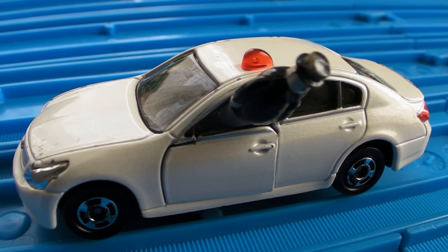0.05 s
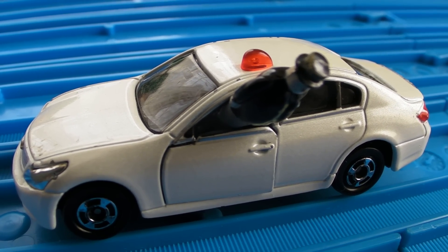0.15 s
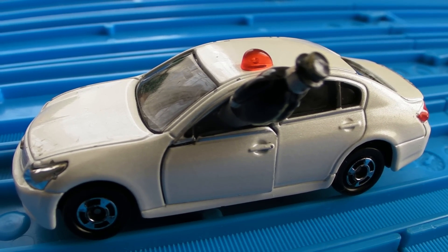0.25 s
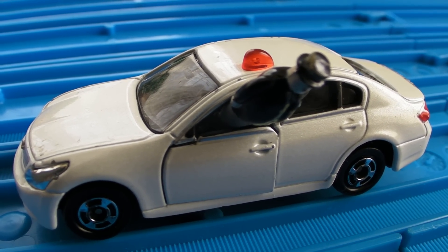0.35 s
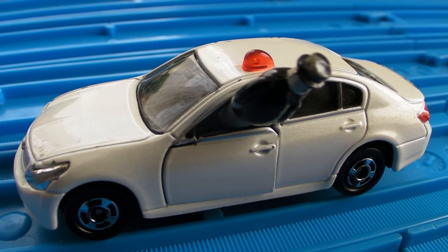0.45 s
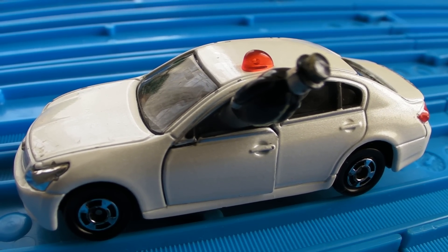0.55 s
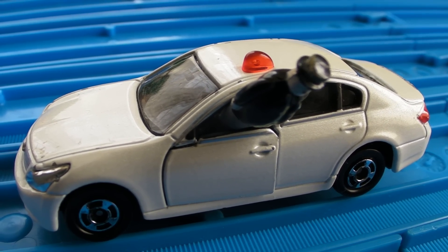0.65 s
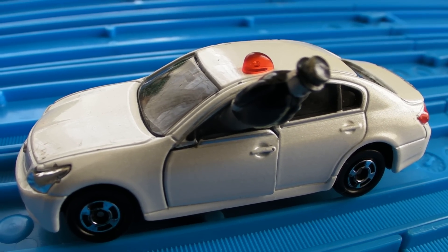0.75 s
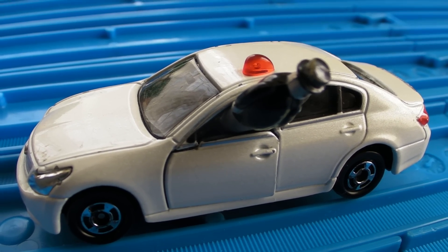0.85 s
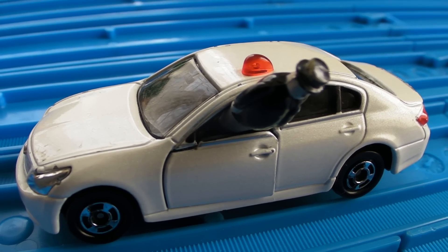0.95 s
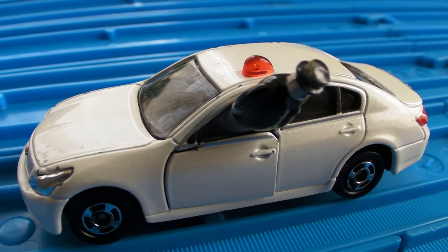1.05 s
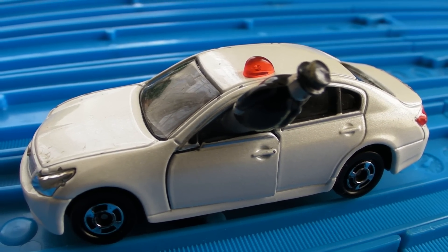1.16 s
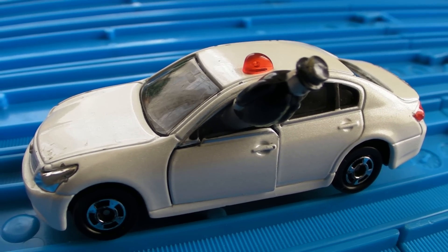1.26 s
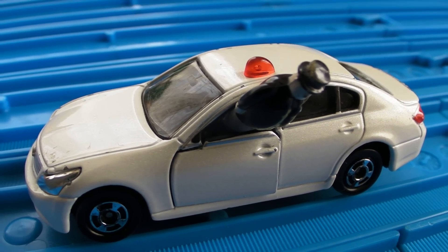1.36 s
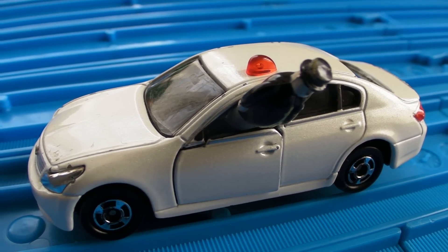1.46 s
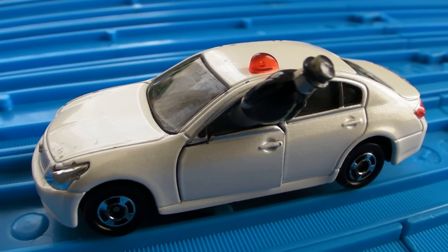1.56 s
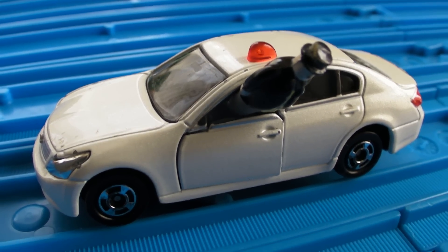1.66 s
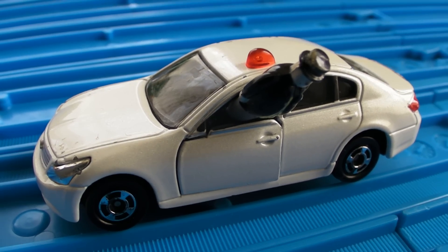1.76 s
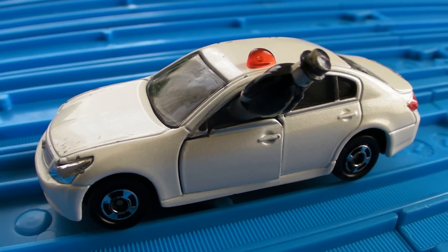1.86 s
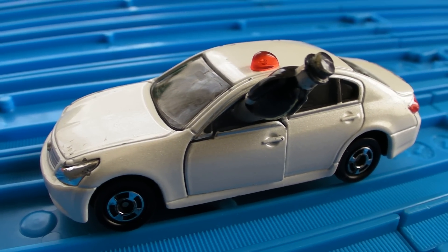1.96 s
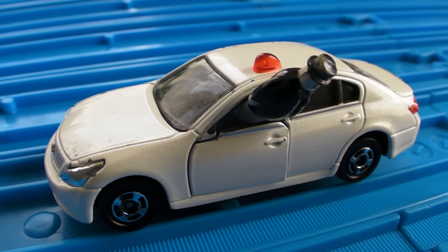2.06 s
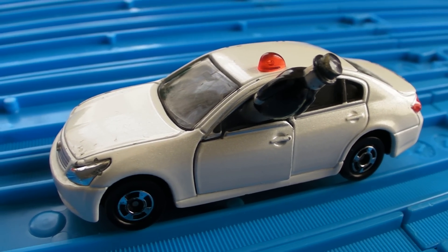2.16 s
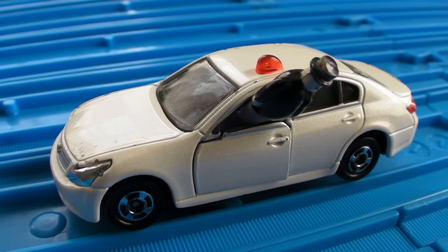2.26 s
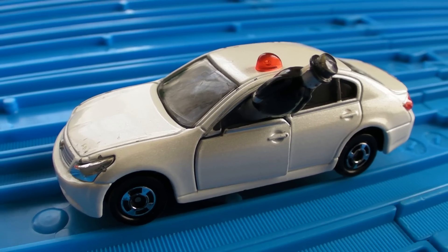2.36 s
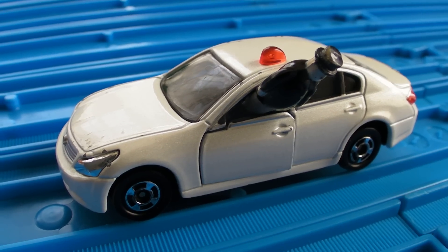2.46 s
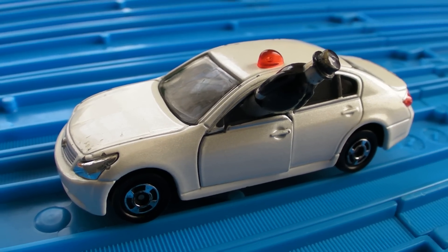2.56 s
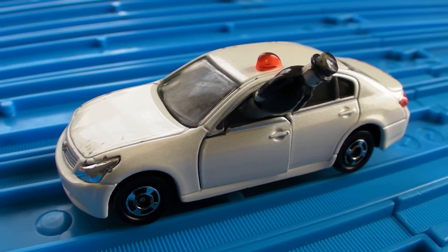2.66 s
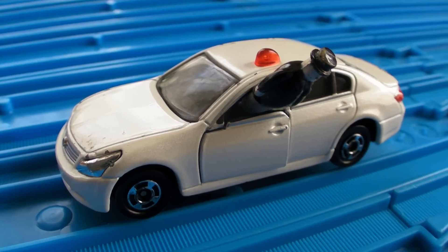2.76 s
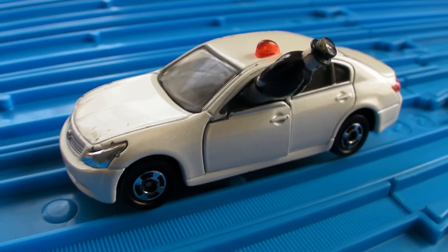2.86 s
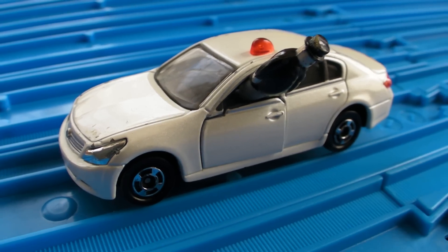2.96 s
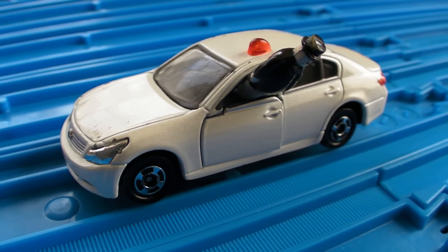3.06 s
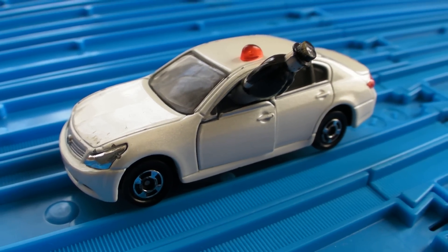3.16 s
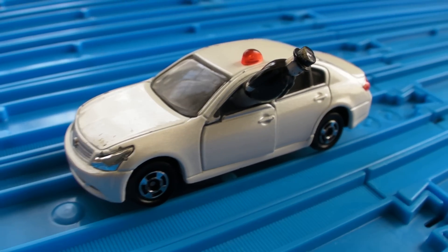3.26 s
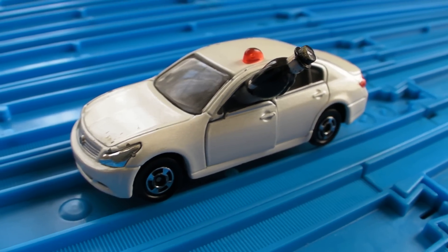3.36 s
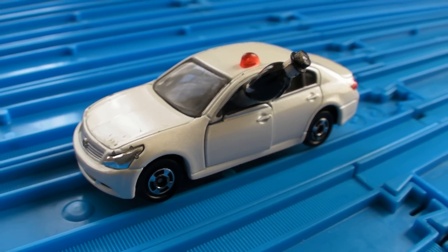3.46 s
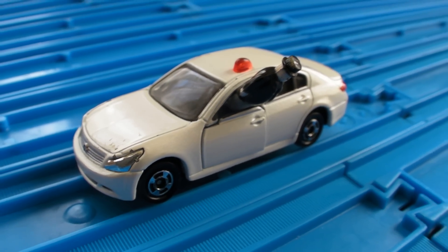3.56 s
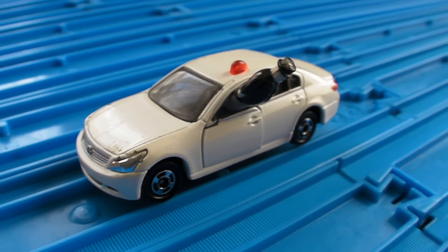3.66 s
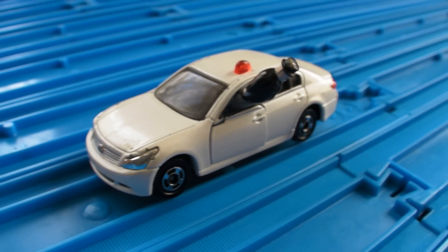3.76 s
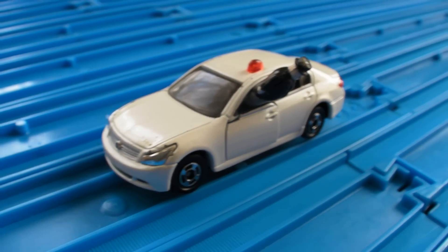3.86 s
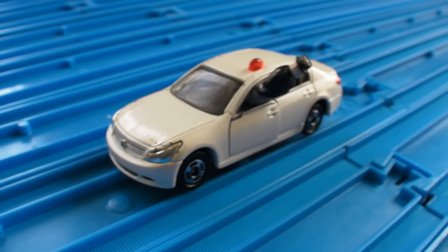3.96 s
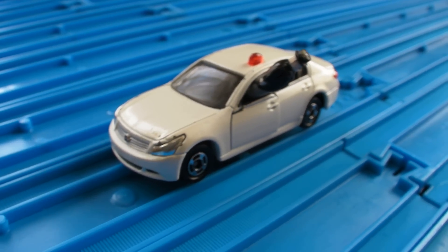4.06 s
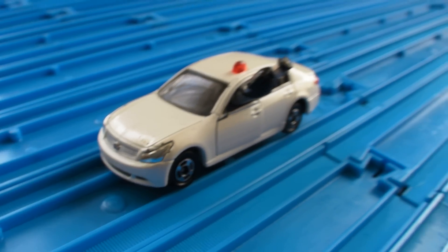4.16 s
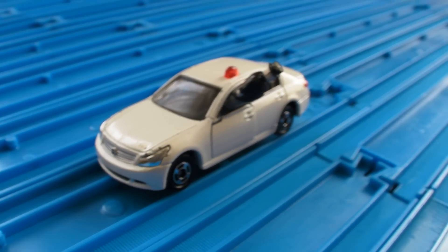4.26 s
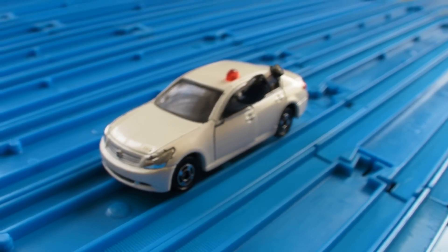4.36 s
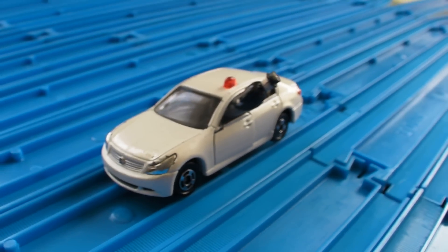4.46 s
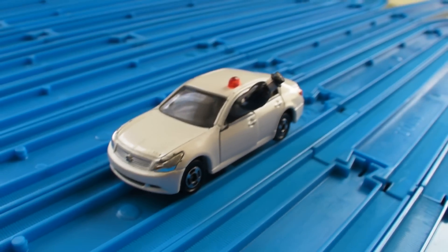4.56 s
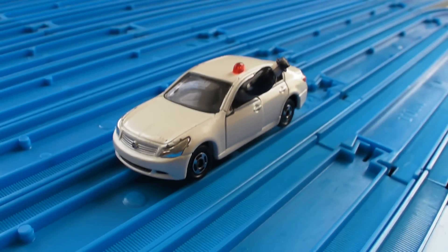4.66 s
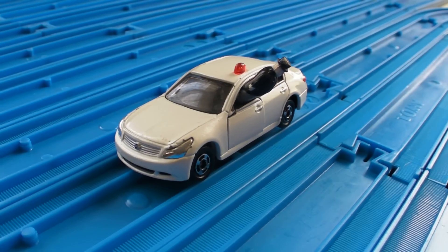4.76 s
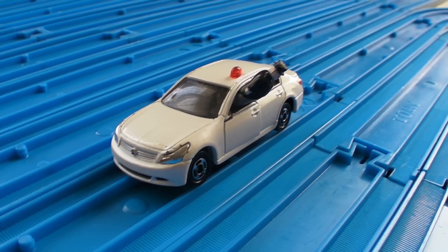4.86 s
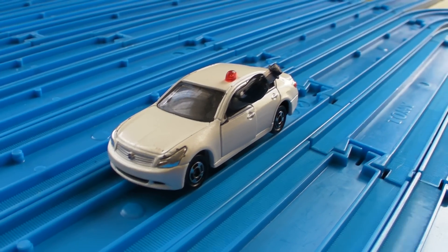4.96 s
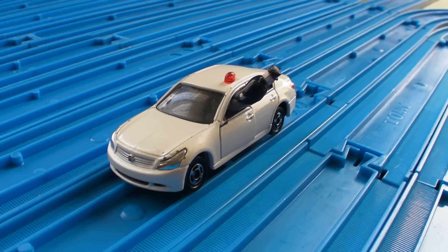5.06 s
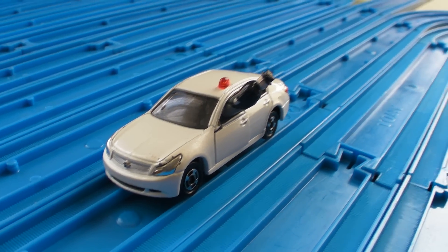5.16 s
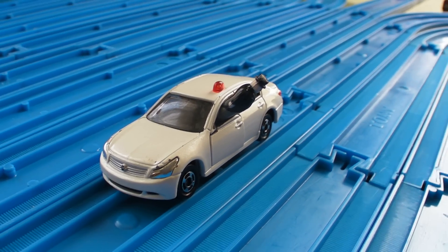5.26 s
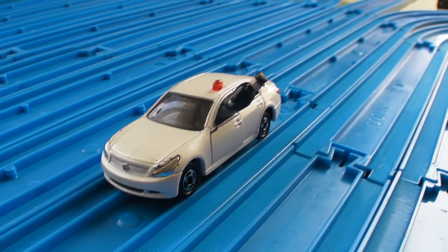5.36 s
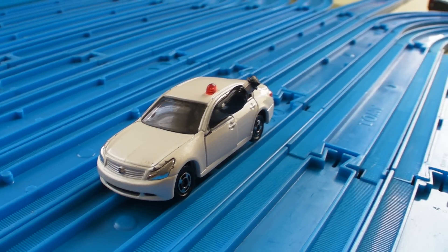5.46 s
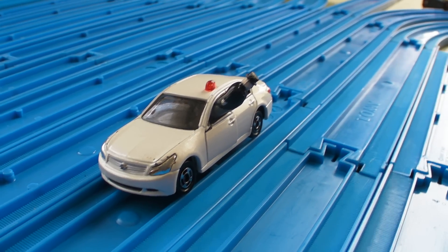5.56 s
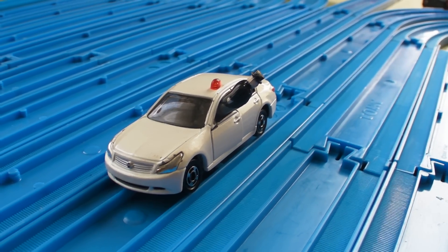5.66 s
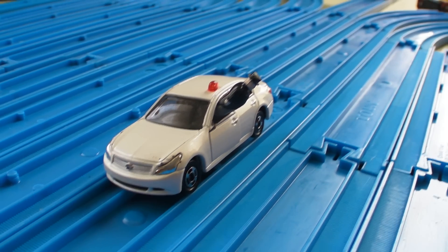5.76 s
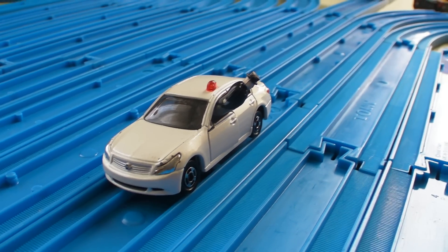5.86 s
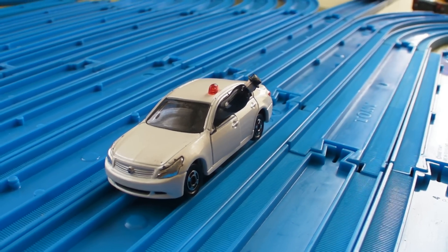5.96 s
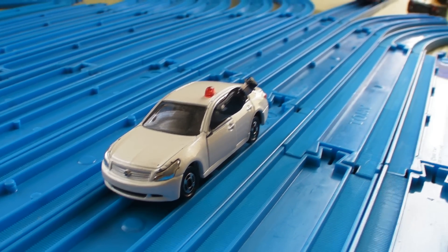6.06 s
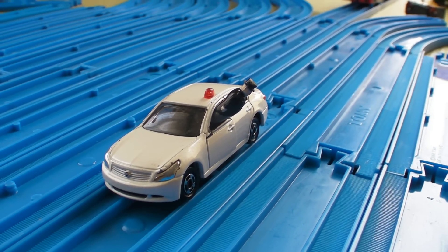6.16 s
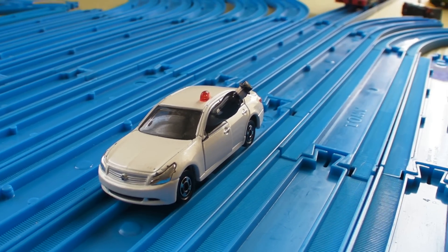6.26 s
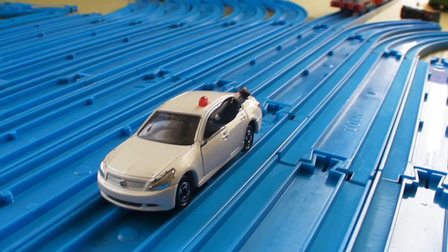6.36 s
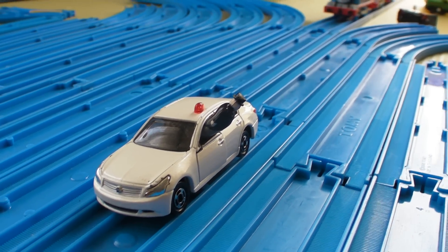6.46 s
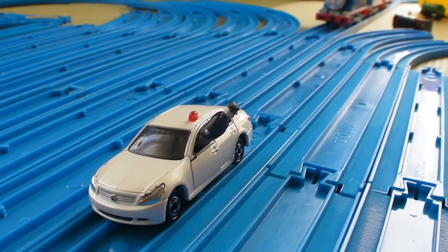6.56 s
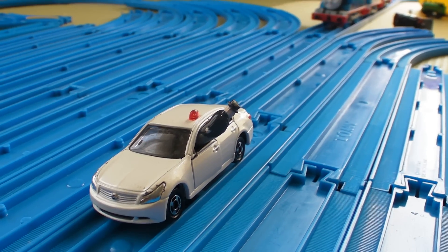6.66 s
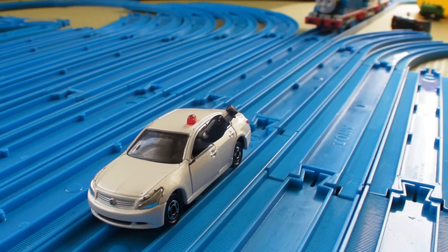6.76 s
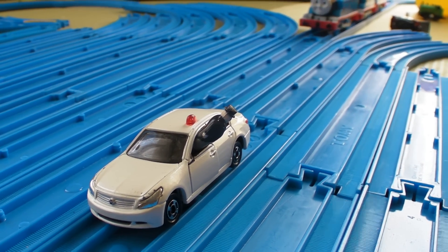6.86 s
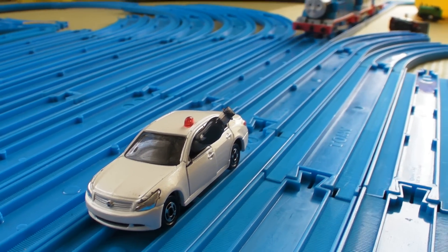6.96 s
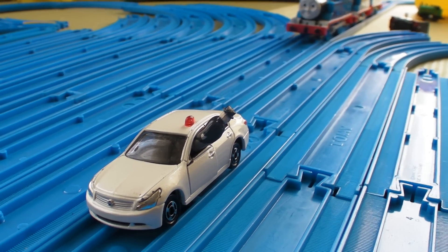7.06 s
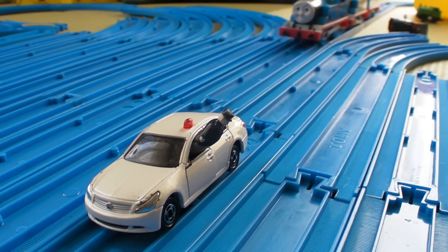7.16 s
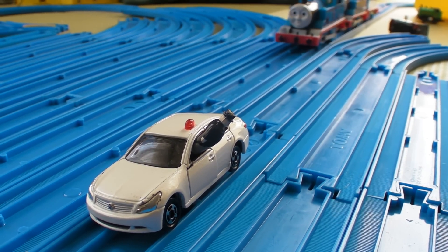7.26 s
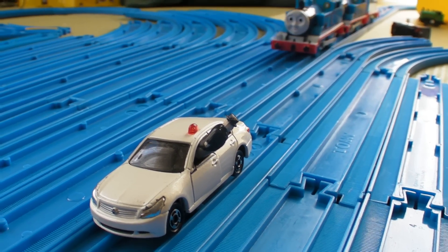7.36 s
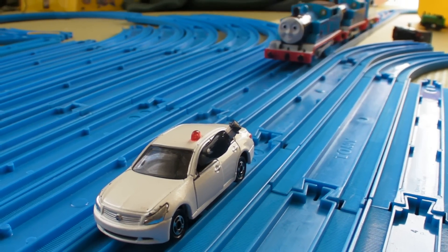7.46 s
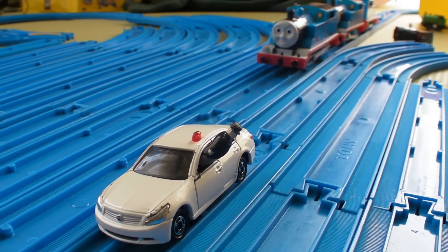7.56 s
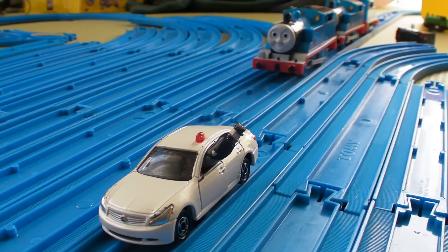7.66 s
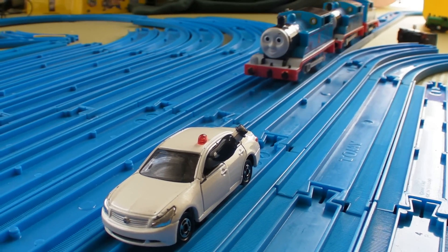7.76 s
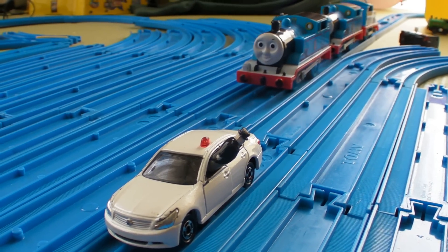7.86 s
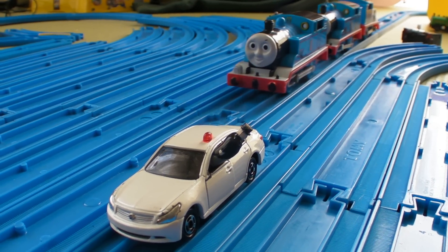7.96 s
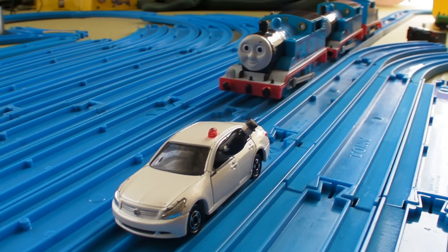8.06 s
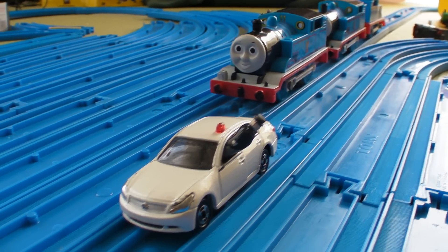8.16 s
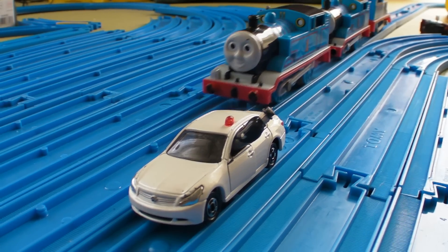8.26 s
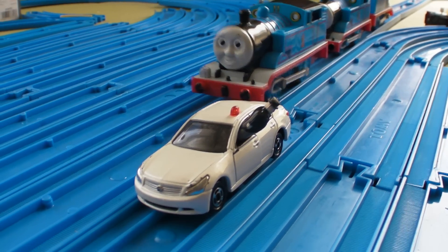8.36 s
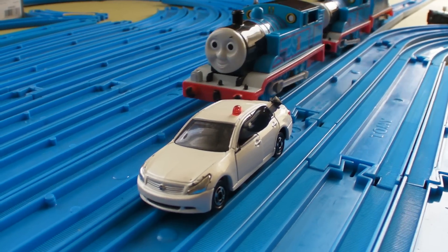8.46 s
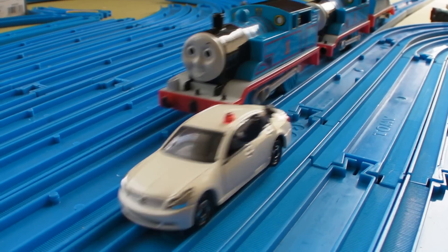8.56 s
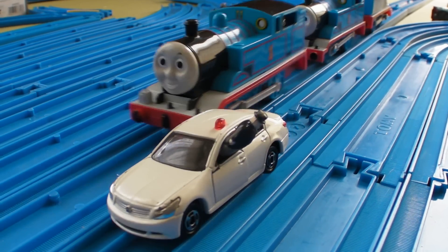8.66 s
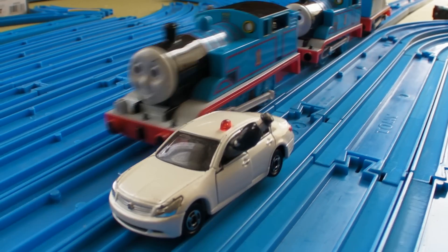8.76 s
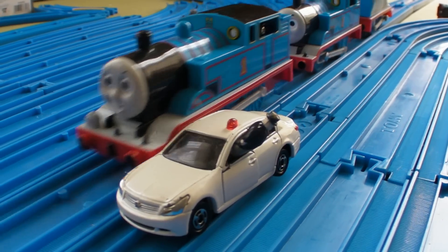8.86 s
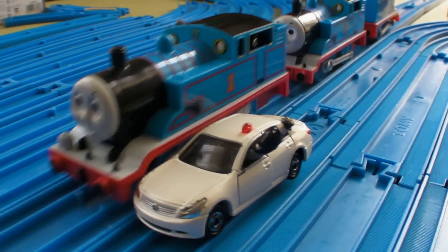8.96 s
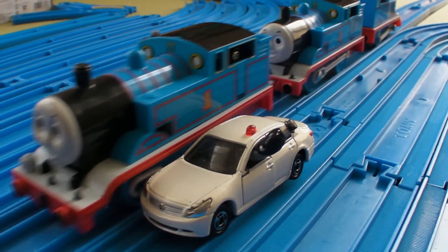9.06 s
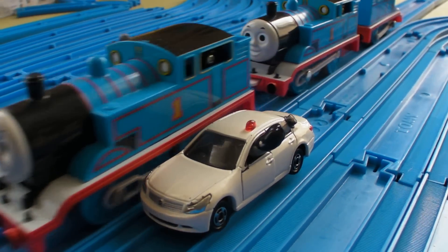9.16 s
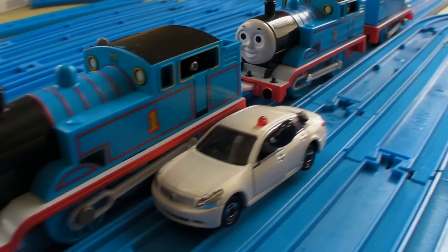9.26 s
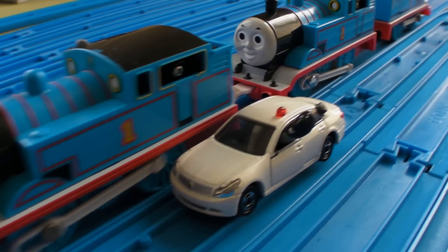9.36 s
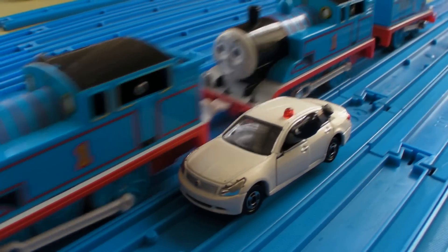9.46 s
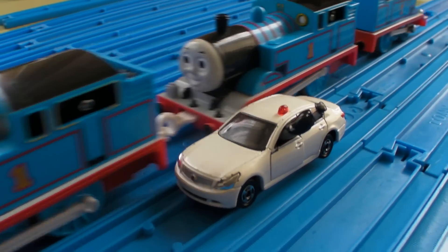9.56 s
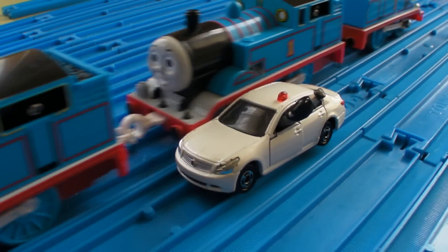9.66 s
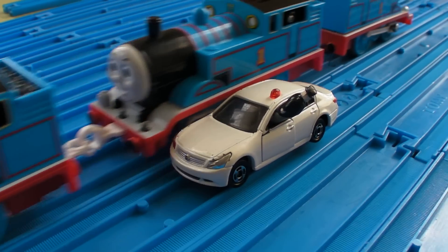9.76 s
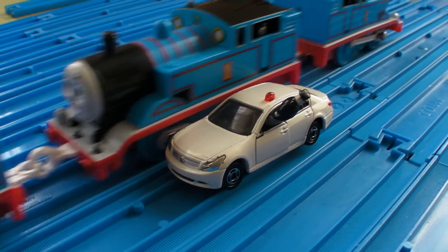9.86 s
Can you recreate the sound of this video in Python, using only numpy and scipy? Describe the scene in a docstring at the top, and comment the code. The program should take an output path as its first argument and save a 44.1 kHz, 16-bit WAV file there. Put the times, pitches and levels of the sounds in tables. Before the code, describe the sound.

In a small, dry room a battery-powered toy train runs on plastic track. Its gear whine continually sags and recovers over a thin rasp, faint at first. A sharp click comes early, a muffled bump at about four seconds, then small knocks. The train gradually nears the microphone, whining and rattling loudest near nine seconds, with another sharp click just before, and is still buzzing at the end.

```python
"""In a small room a battery toy train runs round a plastic track and comes up close to the microphone. Its
plastic gears whine as mesh tones, the pitch sagging and recovering with the load; the rasp of chattering teeth
is noise coloured by the plastic shell. Wheel roll is coloured noise; plastic knocks, two sharp clicks and a few
soft bumps are noise bursts in resonators, above a low rumble."""
import sys
import numpy as np
from scipy import signal
from scipy.fft import rfft, irfft, next_fast_len
from scipy.io import wavfile
from scipy.ndimage import map_coordinates

SR = 44100
rng = np.random.default_rng(int(sys.argv[2]) if len(sys.argv) > 2 else 0)


def unload_audio(sound):
    """Save the sound as a 16-bit wav file, at the path given as the first command line argument."""
    columns = np.transpose(np.atleast_2d(sound))
    # keep every value between -1 and 1, then stretch to whole-number steps
    steps = np.round(np.clip(columns, -1, 1) * 32767)
    wavfile.write(sys.argv[1], SR, steps.astype(np.int16))


N = 437031
TIME = np.arange(N) / SR


def from_db(db):
    """Amplitude factor of a level in dB."""
    return 10 ** (np.asarray(db) / 20)


def rms_one(x):
    """Scale to rms 1."""
    return x / np.sqrt(np.mean(x ** 2) + 1e-20)


def in_time(rows):
    """Each column of a curve at every sample."""
    s, *columns = np.transpose(rows)
    return [np.interp(TIME, s, column) for column in columns]


def swell(s, half_s, steepness=2, skew=1):
    """Smooth hump of height 1 at s, half at half_s on either side; skew steepens the rise, draws out the fall."""
    side_s = np.where(TIME < s, half_s / skew, half_s * skew)
    distance = np.minimum(np.abs(TIME - s) / side_s, 4)
    return .5 ** distance ** steepness


def lowpass(x, hz):
    """Second-order low-pass."""
    return signal.sosfilt(signal.butter(2, min(hz, SR / 2 - 1), fs=SR, output="sos"), x)


def drift(hz):
    """Chance fluctuation slower than hz, with spread 1."""
    settled = lowpass(rng.standard_normal(N + SR), hz)[SR:]
    return rms_one(settled)


def colour(x, spectrum):
    """Smooth response of a body, falling 12 dB per octave outside its table; rms 1."""
    size = next_fast_len(N)
    hz, db = np.transpose(spectrum)
    bins_hz = np.maximum(np.fft.rfftfreq(size, 1 / SR), 1)
    outside = np.maximum(np.maximum(hz[0] / bins_hz, bins_hz / hz[-1]), 1)
    gain = from_db(np.interp(np.log(bins_hz), np.log(hz), db)) / outside ** 2
    return rms_one(irfft(rfft(x, size) * gain, size)[..., :N])


def resonate(x, hz, width_hz):
    """One resonance, gain 1 on top."""
    r = np.exp(-np.pi * width_hz / SR)
    zeros = np.array([1, 0, -1]) * (1 - r * r) / 2
    poles = [1, -2 * r * np.cos(2 * np.pi * hz / SR), r * r]
    return signal.lfilter(zeros, poles, x + 1e-18)


def burst(s, rise_s, decay_s):
    """Half a second of contact noise that swells and dies, and its place in time."""
    start = int(s * SR)
    span = slice(start, min(start + SR // 2, N))
    age_s = TIME[span] - TIME[span][0]
    envelope = (1 - np.exp(-(age_s / rise_s) ** 2)) * np.exp(-age_s / decay_s)
    return span, rng.standard_normal(len(age_s)) * envelope


def widen(mid, side, likeness):
    """Left and right from a shared and an opposed part."""
    c = np.clip(likeness, 0, 1)
    opposed = side * np.array([[1], [-1]])
    return np.sqrt((1 + c) / 2) * mid + np.sqrt((1 - c) / 2) * opposed


# Load dragging the motor down. Each row: deepest point in seconds, length in seconds,
# sag of the mesh rate in Hz, whine gain in dB.
LOAD_SAGS = [(0.051, 0.2, 165, 7.5), (0.378, 0.27, 254, 16), (0.589, 0.16, 105, 3.5),
             (.81, 0.38, 182, 10.5), (1.265, .35, 215, 16), (1.635, 0.27, 290, 14.5),
             (2.131, 0.19, 275, 16), (2.557, 0.29, 320, 24.5), (3.04, .26, 309, 16),
             (3.467, 0.14, 315, 14.5), (3.589, 0.12, 150, 6), (3.841, .27, 119, 4.5),
             (4.235, 0.2, 255, 8.5), (4.4, .12, 135, 2), (4.7, 0.28, 320, 16), (5.118, 0.28, 208, 5),
             (5.631, .26, 345, 12), (6.027, 0.11, 265, 15.5), (6.112, .04, 195.5, 15.5), (6.259, .2, 90, 2),
             (6.521, 0.31, 287, 19), (6.906, 0.34, 228, 17), (7.329, .38, 219, 14), (7.638, 0.091, 155, 11),
             (7.841, .24, 237, 8.5), (8.194, 0.12, 265, 6), (8.281, 0.067, 315, 12), (8.352, 0.059, 215, 8),
             (8.835, .14, 60, -2), (9.155, 0.25, 262, 4.5), (9.701, 0.5, 227, 3.5)]
# Drive falters, then catches with a spurt. Each row: time in seconds, dip in dB, spurt in dB,
# jump of the mesh rate in Hz.
DRIVE_FALTERS = [(0.636, 2.5, 0, 170.5), (1.89, 6, 3.5, 70), (3.911, 6.5, 3, 160), (4.666, 0.5, 1, 90),
                 (5.175, 0.5, -1, 80), (5.868, 4.5, 2.5, 21), (6.052, 3, 2, 80), (6.135, 3, 1.5, 39),
                 (6.7, 2, 0.5, 69.5), (7.654, 3, 2, 59.5), (8.218, 1, 0.5, 81), (8.3, 4, 3, 19),
                 (8.395, 4.5, 7, -0.5), (8.47, 7, 5, 70), (8.589, 2.5, 2.5, 20.5), (8.7, 9, 6, 159.5)]
# Gears as the train nears, before sags and falters. Each row: time in seconds, chatter in dB,
# whine relative to chatter in dB.
GEAR_CURVE = [(0, -31.5, -12), (2.8, -32, -16.5), (2.9, -30, -11.5), (3.35, -29.5, -10),
              (4.05, -29.5, -9.5), (4.24, -24.5, -7.5), (4.36, -27.5, -11), (5.45, -25, -7.5),
              (6.15, -24.5, -13.5), (7.6, -20.5, -9.5), (8.15, -19.5, -3.5), (8.55, -19, -2),
              (8.88, -18.5, -1.5), (9.05, -19.5, -2), (9.91, -22, -6)]


def drive(free_mesh_hz=1310, sag_steepness=2.7, pressure_lead_s=0.0088):
    """Mesh rate, whine and chatter levels: load slows the gears and presses the teeth into a louder tone."""
    falter_s, catch_after_s, spurt_s = 0.027, 0.04, 0.018
    slip_after_s, slip_skew = 0.031, 1.5  # the motor races at once and is pulled back more slowly
    chatter_db, whine_over_chatter_db = in_time(GEAR_CURVE)
    mesh_hz = np.full(N, float(free_mesh_hz))
    for s, length_s, sag_hz, gain_db in LOAD_SAGS:
        mesh_hz -= sag_hz * swell(s, length_s / 2, sag_steepness)
        # the teeth feel the load before the motor has slowed
        whine_over_chatter_db += gain_db * swell(s - pressure_lead_s, length_s / 2, sag_steepness)
    for s, dip_db, spurt_db, jump_hz in DRIVE_FALTERS:
        dip = swell(s, falter_s)
        spurt = swell(s + catch_after_s, spurt_s)
        mesh_hz += jump_hz * swell(s + slip_after_s, spurt_s, skew=slip_skew)
        chatter_db += spurt_db * spurt - dip_db * dip
        whine_over_chatter_db -= dip_db * dip  # the tone dips twice as far as the rasp
    return mesh_hz, chatter_db + whine_over_chatter_db, chatter_db


WHEEL_TEETH = 35


def whine(teeth, mesh_hz, whine_db, chatter_db):
    """Mesh tones: the main one at twice the mesh rate; an off-centre wheel throbs them once a turn."""
    slop_rad, slack_slop_rad, sway_rad = 0.091, 0.2, 0.11
    wobble, slack_throb, bead_throb = 0.014, 0.85, 0.2
    flutter_db, hum_db, braking_db = 3.0, -61, 11
    wheel = 2 * np.pi * teeth / WHEEL_TEETH
    # running fast and unloaded, the teeth lose their grip: the tone smears and breaks into pulses
    slack = np.clip((mesh_hz - 1085) / 180, 0, 1)
    jitter = (slop_rad + slack * slack_slop_rad) * drift(96)
    phase = 2 * np.pi * teeth + jitter + sway_rad * np.cos(wheel)
    throb = 1 + (wobble + slack * slack_throb) * np.sin(wheel)
    main = from_db(whine_db) * rms_one(np.sin(2 * phase) * throb * from_db(flutter_db * drift(42)))
    # the teeth bite hardest on one side of the wheel, which beads the overtones and hum
    beads = throb * (1 + bead_throb * np.sin(wheel))
    # hum at the mesh rate, an octave below the main tone, grows while the load slows the gears
    slowing_hz_per_s = lowpass(-np.gradient(mesh_hz) * SR, 19)
    braking = np.clip(slowing_hz_per_s / 900, 0, 1)
    hum = rms_one(np.sin(phase) * beads * from_db(flutter_db * drift(40)))
    hum = from_db(hum_db + braking_db * braking) * hum
    return main + hum + overtones(phase, beads, mesh_hz, whine_db, chatter_db)


# Tones above the main whine. Each row: multiple of the mesh rate, relative level in dB.
OVERTONE_MIX = [(3, -10), (4, -6.5), (5, -2), (6, -1.5), (7, -6.5)]
# Their course. Each row: time in seconds, change of the third in dB, change of the higher ones in dB.
OVERTONE_CURVE = [(.3, -0.5, -4), (1.3, 4.5, 0), (1.8, 1, -1), (3.05, -14, -3), (3.3, 4.5, -5),
                  (4.3, -2, -6), (4.7, 8, -5.5), (5.1, 10, -28), (5.35, 2.5, -10), (5.62, 8.5, -3.5),
                  (6.08, 0, -5), (6.23, 9.5, -20), (6.4, 6, -6), (8.1, 0, -4), (8.27, 7.5, -8),
                  (8.4, -6, -25), (9.15, -1, -3), (9.7, -4, 3.5)]
# Plastic shell driven by the teeth. Each row: frequency in Hz, relative response in dB.
SHELL_RESPONSE = [(1000, -20), (1780, -10.5), (2000, 6), (2300, 0.5), (2780, -2), (3070, 2.5), (3450, -1.5),
                  (3750, 1.5), (4150, -3.5), (5300, -1.5), (5850, -0.5), (6700, -3.5), (7650, 1),
                  (8200, -7), (10700, -7.5), (11800, -19.5), (13300, -15.5), (15300, -28)]


def overtones(phase, beads, mesh_hz, whine_db, chatter_db, trim_db=-1, flutter_db=3.0, jitter_rad=0.31):
    """Mesh harmonics swell as they glide through the shell's resonances."""
    ripple_depth_db, ripple_step_hz, pressure_share = 3.5, 110, 0.3
    third_db, higher_db = in_time(OVERTONE_CURVE)
    # the shell's many narrow resonances make the higher overtones patchy
    ripple_hz = np.arange(0, SR / 2, ripple_step_hz)
    ripple_db = ripple_depth_db * np.clip(rng.standard_normal(len(ripple_hz)), -2, 1)
    total = 0
    for multiple, db in OVERTONE_MIX:
        tone_hz = multiple * mesh_hz
        jitter = jitter_rad * (multiple - 3) * drift(115)
        tone = np.sin(multiple * phase + jitter + rng.uniform(0, 2 * np.pi))
        tone = rms_one(tone * beads * from_db(flutter_db * drift(49)))
        shell_db = np.interp(tone_hz, *np.transpose(SHELL_RESPONSE))
        if multiple == 3:
            course_db = third_db
        else:
            course_db = higher_db + np.interp(tone_hz, ripple_hz, ripple_db)
        total = total + tone * from_db(db + shell_db + course_db)
    # overtones grow with both tooth pressure and chatter
    pressure_db = pressure_share * (whine_db - chatter_db)
    return total * from_db(chatter_db + pressure_db + trim_db)


def chatter(teeth, chatter_db, likeness=0.33, trim_db=3.0, bite=0.22, repeat=0.15, spread_hz=4600):
    """Each tooth scrapes the next with a force of its own and shakes the shell."""
    uneven_db, wheel_db = 1.0, -0.14
    force_db = uneven_db * drift(125) + wheel_db * np.sin(2 * np.pi * teeth / WHEEL_TEETH)
    scrapes = rng.standard_normal((2, N)) * from_db(force_db) * (1 + bite * np.cos(2 * np.pi * teeth))
    # each scrape partly repeats the one before: the rasp gathers in broad bands that glide with speed
    tooth_before = np.round(np.interp(teeth - 1, teeth, np.arange(N))).astype(int)
    mid, side = colour(scrapes + repeat * scrapes[:, tooth_before], SHELL_RESPONSE)
    # only the short waves differ between the two sides
    side = signal.sosfilt(signal.butter(2, spread_hz, "high", fs=SR, output="sos"), side)
    return from_db(chatter_db + trim_db) * widen(mid, side, likeness)


# Wheels on the track. Each row: frequency in Hz, relative response in dB.
ROLLING_RESPONSE = [(290, -21), (390, 0.5), (650, -4.5), (1000, -6), (1500, -1.5), (2500, -11.5)]


def rolling(rolling_db, grain_db=3.0, likeness=0.85):
    """Ribbed wheels patter on the hollow track: fluctuating noise coloured by the track."""
    patter = rng.standard_normal((2, N)) * from_db(grain_db * drift(114))
    mid, side = colour(patter, ROLLING_RESPONSE)
    return from_db(rolling_db) * widen(mid, side, likeness)


# Plastic knocks and clicks. Each row: start in seconds, relative level in dB, pitch in Hz,
# decay in seconds.
KNOCKS = [(1.271, -5.5, 7500, 0.00097), (4.331, -20, 1710, 0.0049), (4.674, -24.5, 687, 0.0044),
          (5.124, -24, 750, 0.0064), (5.178, -30, 750, 0.0059), (5.232, -27, 756, 0.006),
          (6.12, -26.5, 642, 0.0072), (7.655, -27.5, 684.5, 0.0058), (7.719, -22, 893, 0.0052),
          (8.293, -21, 1304, .004), (8.443, -13, 5000, .0005), (8.75, -18.5, 995, 0.0094)]


def ticks(rise_s=0.0001, damping=3, trim_db=4):
    """Knocks of plastic on plastic: the shorter, the broader their spectrum."""
    out = np.zeros(N)
    for s, db, hz, decay_s in KNOCKS:
        span, crack = burst(s, rise_s, decay_s)
        tick = resonate(crack, hz, damping / decay_s)
        out[span] += from_db(db + trim_db) * tick / np.abs(tick).max()
    return out


def squeak(s=1.922, level_db=-38, centre_hz=1360, length_s=0.025, fall_hz_per_s=1200):
    """A brief tone for a moment as the drive catches, falling in pitch."""
    pitch_hz = centre_hz - fall_hz_per_s * np.clip(TIME - s, -length_s, length_s)
    tone = np.sin(2 * np.pi * np.cumsum(pitch_hz) / SR)
    return from_db(level_db) * swell(s, length_s / 2) * tone


def air(x, above_hz):
    """Only the highest treble of a signal."""
    return signal.fftconvolve(x, signal.firwin(63, above_hz, fs=SR, pass_zero=False), "same")


def passing(x, above_hz=8400, s=10.08, half_s=0.38, lift_db=4.9):
    """Close by, the gears sizzle more brightly; the lift is still rising at the end."""
    extra = from_db(lift_db * swell(s, half_s)) - 1
    return x + extra * np.array([air(side, above_hz) for side in x])


# Highest treble on the left. Each row: time in seconds, lift in dB.
LEFT_TREBLE = [(0, -0.5), (5.5, 1.5), (6.3, 3), (7.6, 4.5), (8.6, 7), (9.4, 5.5), (9.9, -1)]


def left_path(left, delay_samples, above_hz=10700):
    """The left side hears the train slightly later, with its own highest treble."""
    air_db, = in_time(LEFT_TREBLE)
    brightened = left + (from_db(air_db) - 1) * air(left, above_hz)
    return map_coordinates(brightened, [np.arange(N) - delay_samples], order=3, mode="nearest")


# Soft bumps. Each row: time in seconds, relative level in dB, strongest frequency in Hz,
# decay of the blow in seconds.
SOFT_BUMPS = [(.908, -36, 338, 0.018), (1.981, -26.5, 279.7, 0.039), (2.495, -34, 185.2, 0.028),
              (4.194, -11, 420, 0.056), (4.269, -34, 81, 0.027), (4.44, -40, 264.3, 0.034)]
# Modes the bumps ring in. Each row: frequency in Hz, relative level in dB, 60 dB decay in seconds.
BUMP_MODES = [(81.6, 1, 0.46), (174.5, 1.5, 0.24), (213.6, 8, 0.13), (264, -15, 0.9), (348, 0, 0.14),
              (388, 8.5, 0.2), (430, -9, 0.32), (464, 7.5, 0.18), (602, -9, 0.63), (890, -23, .12)]


def bumps(rise_s=0.021, octaves=0.44, trim_db=-12):
    """Soft blows wake the low modes, most of all those near their own pitch."""
    out = np.zeros(N)
    for s, db, centre_hz, decay_s in SOFT_BUMPS:
        thud = 0
        for hz, mode_db, t60_s in BUMP_MODES:
            span, push = burst(s - rise_s, rise_s, decay_s)
            ring = resonate(push, hz, np.log(1000) / (np.pi * t60_s))
            nearness = 1 / (1 + (np.log2(hz / centre_hz) / octaves) ** 2)
            thud = thud + rms_one(ring) * from_db(mode_db) * nearness
        out[span] += from_db(db + trim_db) * rms_one(thud)
    return out


def room(x, t60_s=0.13, wall_hz=6000, likeness=0.96):
    """A short diffuse tail from the near walls: decaying low-passed noise as impulse response."""
    age_s = TIME[:SR // 2]
    noise = lowpass(rng.standard_normal((2, len(age_s))), wall_hz)
    mid, side = noise * from_db(-60 * age_s / t60_s) * (age_s > .003)
    tail = widen(mid, side, likeness)
    tail = tail / np.sqrt(np.sum(tail ** 2) / 2)
    return signal.fftconvolve(x[None], tail, axes=1)[:, :N]


# Low rumble. Each row: frequency in Hz, relative response in dB.
RUMBLE_RESPONSE = [(25, -28), (80, 0.5), (140, -2.5), (400, -5)]
# Its course. Each row: time in seconds, level in dB.
RUMBLE_CURVE = [(0, -49.5), (.8, -48), (2.6, -52.5), (3.3, -48.5), (4.8, -51), (6.9, -51), (8.7, -48),
                (9.3, -54.5)]


def rumble(likeness=0.82):
    """Low noise, slowly changing in level."""
    level_db, = in_time(RUMBLE_CURVE)
    mid, side = colour(rng.standard_normal((2, N)), RUMBLE_RESPONSE)
    return from_db(level_db) * widen(mid, side, likeness)


# Train's approach. Each row: time in seconds, treble lift in dB, rolling level in dB,
# delay of the left side in samples.
APPROACH_CURVE = [(0, 0.5, -43, 2), (4, 1.5, -44.5, 2.5), (6.5, 1.5, -40, 1), (8, -1, -37.5, 0.7),
                  (8.8, -3.5, -33, 0.8), (9.5, 0.5, -38, 0)]


def scene(room_db=-15, treble_hz=4500, waver=0.01, waver_hz=22):
    """The train in its room, the bumps and a low rumble."""
    mesh_hz, whine_db, chatter_db = drive()
    lift_db, rolling_db, delay_samples = in_time(APPROACH_CURVE)
    # running count of teeth through the mesh
    teeth = np.cumsum(mesh_hz * (1 + waver * drift(waver_hz))) / SR
    gears = whine(teeth, mesh_hz, whine_db, chatter_db) + chatter(teeth, chatter_db)
    # the treble of the gears shifts along the approach
    dull = signal.lfilter(*signal.butter(1, treble_hz, fs=SR), gears)
    gears = dull + (gears - dull) * from_db(lift_db)
    train = passing(gears + rolling(rolling_db) + ticks() + squeak())
    train[0] = left_path(train[0], delay_samples)
    # the brighter the train, the smaller the room's share
    echo = room(train[1] * from_db(room_db - lift_db))
    return train + echo + bumps() + rumble()


def record(dry, notch_hz=7900, notch_q=32, clip_level=0.8, cutoff_hz=15400):
    """The microphone has one narrow notch; the highest peaks are clipped and the top is cut."""
    notched = signal.lfilter(*signal.iirnotch(notch_hz, notch_q, fs=SR), dry)
    clipped = np.clip(notched, -clip_level, clip_level)
    return signal.sosfilt(signal.ellip(10, .1, 80, cutoff_hz, fs=SR, output="sos"), clipped)


dry = scene()
out = record(dry)
unload_audio(out)
```